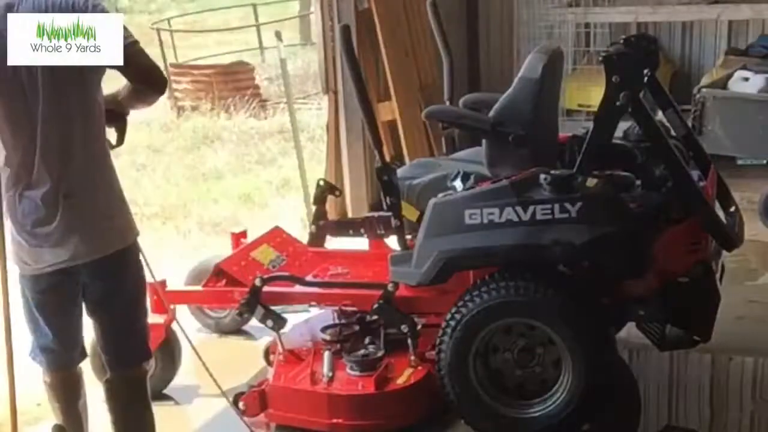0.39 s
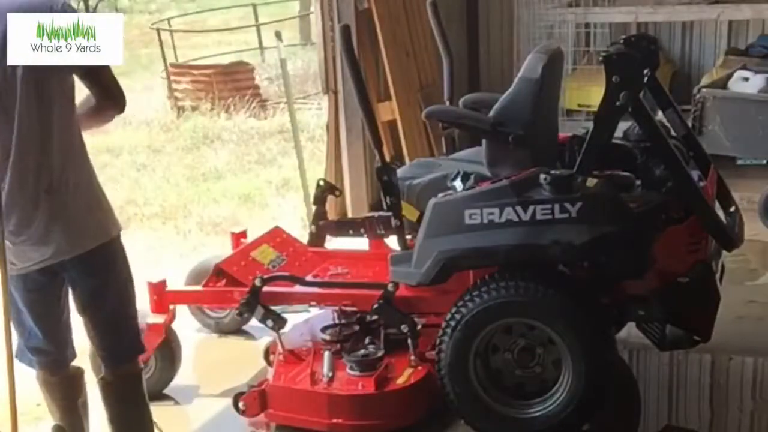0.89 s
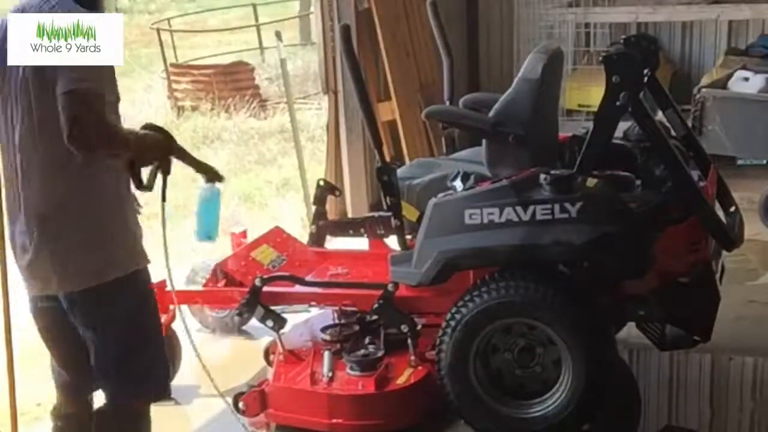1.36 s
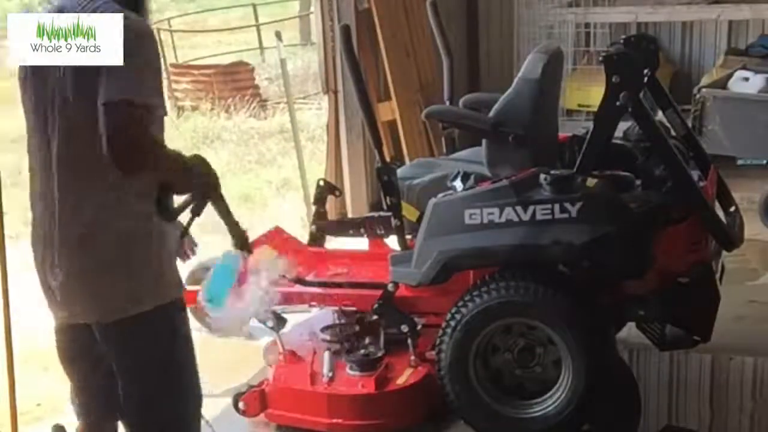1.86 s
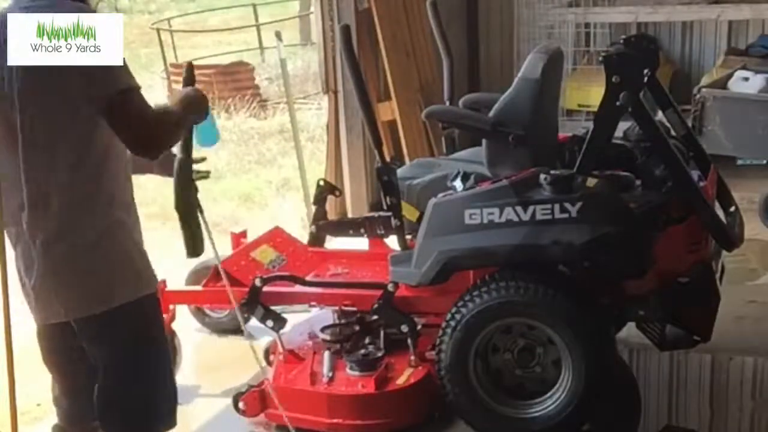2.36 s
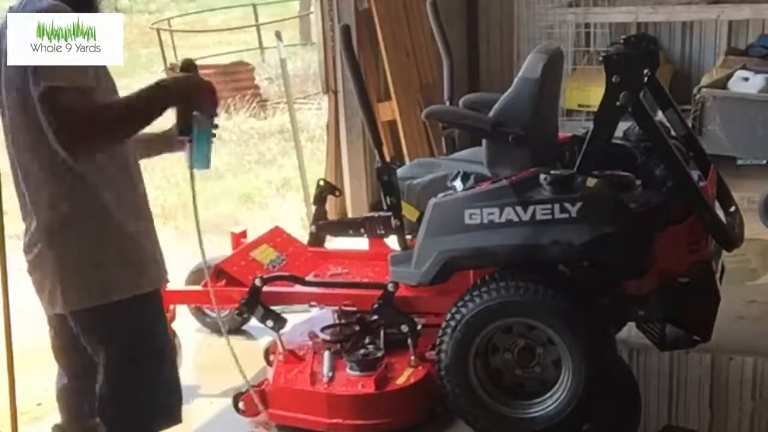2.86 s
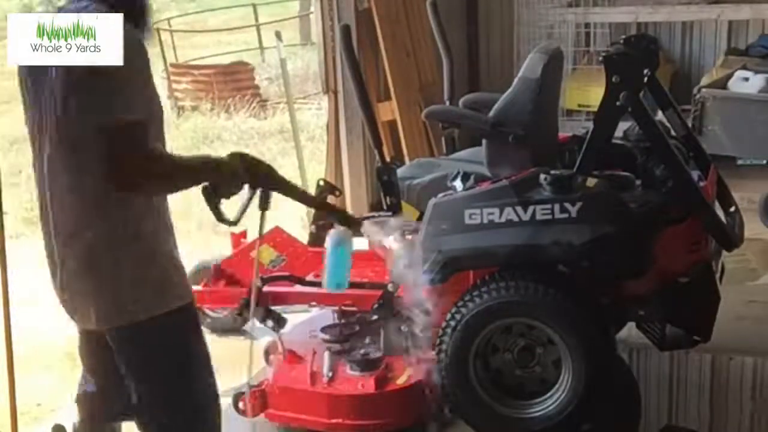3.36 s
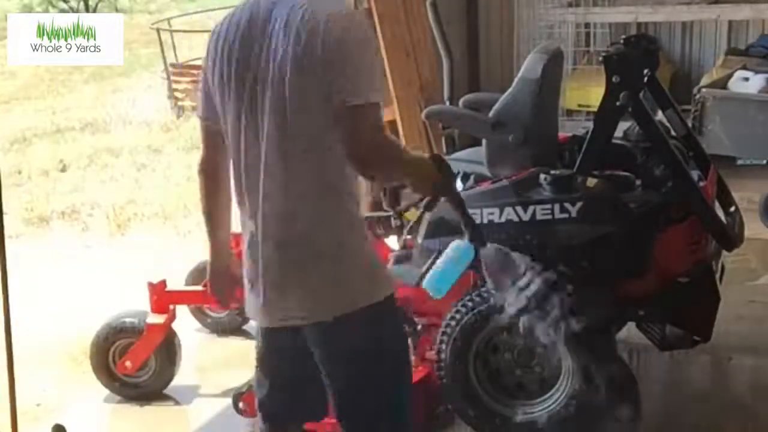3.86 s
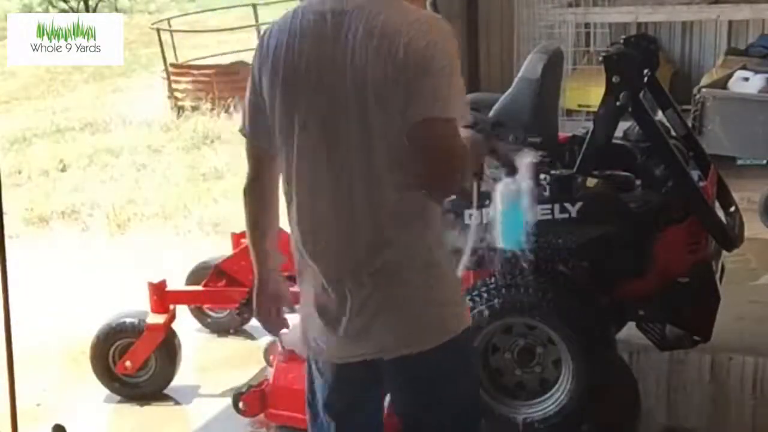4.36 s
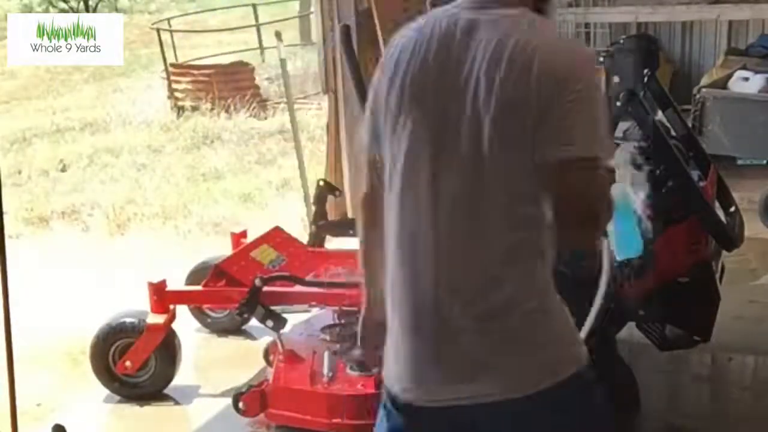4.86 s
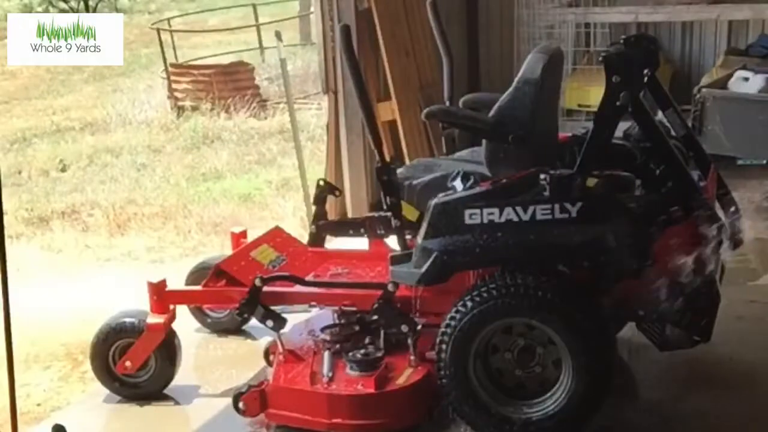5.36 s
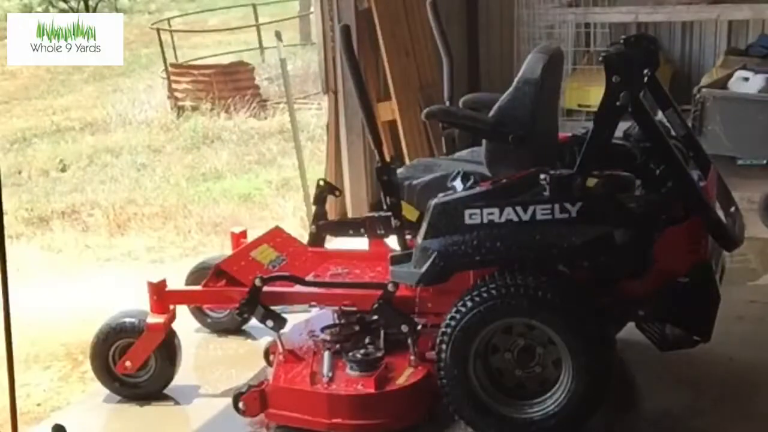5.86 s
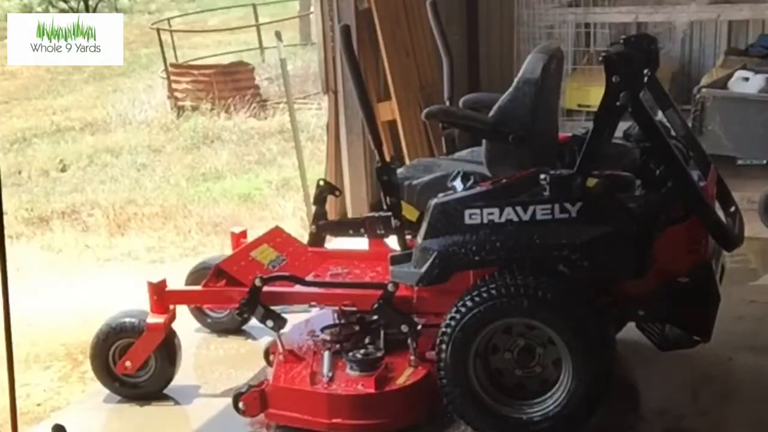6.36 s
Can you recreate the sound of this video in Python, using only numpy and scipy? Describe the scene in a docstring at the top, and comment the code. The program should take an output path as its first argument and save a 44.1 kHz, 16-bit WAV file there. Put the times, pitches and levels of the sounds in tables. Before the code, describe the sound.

In an open shed, an electric pressure washer whines at a high steady pitch over pump rattle and bright spray hiss. Two quick trigger releases make the motor sag and recover. Then it brakes and cuts out with knocks, a thin valve squeal and bleeding water. After a near-silent pause with three crackly spits, it kicks back on, glides up and runs steadily. A fairly close microphone picks up little bass.

```python
"""An electric pressure washer runs in an open shed: motor and gears whine over pump rattle, spray and mist.
Two short trigger releases bog the motor down. At a third, longer one the current is cut, a closing valve
squeals, water bleeds on, the gun spits three times and the motor starts again, then runs on steadily.
Tones are sines locked to the shaft speed, water is shaped noise, knocks and pings are dying sines,
the squeal is blurred gliding sines, and spits are crackly noise puffs through nozzle rings."""
import sys
import numpy as np
from scipy import signal
from scipy.fft import rfft, irfft
from scipy.io import wavfile
from scipy.ndimage import uniform_filter1d

SR = 44100
rng = np.random.default_rng(int(sys.argv[2]) if len(sys.argv) > 2 else 0)


def ratio_of_db(decibels):
    """Turn decibels (scalar or array-like) into linear amplitude factors; 0 dB maps to 1."""
    return 10 ** (np.asarray(decibels, float) / 20)


def dump_mix(stems):
    """Bounce the given channels to the path in sys.argv[1] as a 16-bit WAV at rate SR."""
    frames = np.atleast_2d(stems).T  # one column per channel
    limited = np.clip(frames, -1, 1)  # hard clip at full scale
    pcm = np.round(limited * 32767).astype(np.int16)
    wavfile.write(sys.argv[1], SR, pcm)


N = 286209
T = np.arange(N) / SR  # time of each sample [s]

MESH = 50 / 11  # gear tooth contacts per shaft turn
FIELD_HZ = 120  # magnetic pull at twice the mains
FULL_HZ = 359.4  # shaft at full speed
# weaker tones at full speed: (times shaft [-], times mesh [-], times field [-], level [dB])
WEAK_TONES = [(5, 0, 0, -55), (7, 0, 0, -57), (8, 0, 0, -59), (9, 0, 0, -51), (10, 0, 0, -54),
              (11, 0, 0, -55), (11.78, 0, 0, -48), (15, 0, 0, -53), (16, 0, 0, -59), (17, 0, 0, -55),
              (19, 0, 0, -58), (20, 0, 0, -61), (21, 0, 0, -59), (23, 0, 0, -54), (24, 0, 0, -60),
              (-1, 1, 0, -58), (1, 1, 0, -63), (2, 1, 0, -51), (6, 1, 0, -56), (10, 1, 0, -58),
              (12, 1, 0, -61), (13, 1, 0, -58), (-2, 2, 0, -58), (-1, 2, 0, -52), (1, 2, 0, -54),
              (5, 2, 0, -59), (-1, 3, 0, -58), (1, 3, 0, -62), (0, 5, 0, -55), (12, -1, 0, -60),
              (48, -1, 0, -60), (-1, 1, -1, -54), (1, 1, 1, -54), (0, 1, 1, -63), (1, 2, 1, -59),
              (0, 0, 4, -59), (0, 0, 7, -53), (0.52, 0, 0, -74)]
# reflections off the shed walls: (delay [s])
WALL_DELAYS = (0.017, .023)
# steady running drifts with load and as the user walks about:
# (time [s], shaft speed [Hz], gear mesh tone [dB], swell of the upper whine [dB])
RUNNING = [(0, 355.6, -26, -14), (.04, 358.7, -31.5, 2), (.7, 359.6, -30.5, -6), (1.3, 359.5, -30.5, -1),
           (1.6, 360.8, -38, -2), (1.85, 360.3, -35, 2), (2.08, 359.6, -32.5, 2), (3.6, 359.9, -30, -1.5),
           (3.9, 359.7, -32, 1), (4.3, 359.4, -30, 0), (4.75, 359.2, -30.5, 1), (5.05, 358.8, -27.5, -9),
           (5.35, 359, -29, -13), (5.5, 359.2, -26, -19), (5.88, 358, -27.5, -14),
           (6.15, 358.4, -26.5, -15), (6.49, 358.2, -29.5, -21)]
# short trigger releases: (let go [s], picks up again [s], most speed lost [Hz], run-up time constant [s])
BOGS = [(0.041, 0.121, 51.91, .115), (.797, .885, 124.7, .095)]
# the housing radiates low tones poorly, which sets the once-a-turn hum: (shaft speed [Hz], level [dB])
HUM_BY_SPEED = [(140, -97), (240, -79), (300, -60.5), (335, -50.5), (348, -51), (355, -43.5), (360, -40.5)]
# peaks and dips of housing and shed that each main tone crosses: (speed lost [Hz], change [dB])
MESH_PATH = [(0, -1), (1, 2), (2, -2.5), (3.9, 4.5), (5.6, -8.5), (7.3, -7), (10, 6), (12.7, -3.5),
             (14.5, 2), (20, -1.5), (24, -3.5), (29, 2), (34, -18.5), (44, 4), (60, -4.5), (74, 1.5),
             (92, -6), (125, 3), (150, -5)]
THIRD_PATH = [(0, -1), (5, -4.5), (16, -5), (50, -8.5), (75, -16), (160, -25)]
SIXTH_PATH = [(0, 0.5), (2.5, -1.5), (4.5, 9), (7, 2), (10, -5), (19, 0), (25, -3), (40, 7.5), (55, -5.5),
              (125, -22), (170, 0), (220, 5)]
# upper whine: (times shaft speed [-])
UPPER_ORDERS = (2, 2 * MESH, 12, 13, 3 * MESH, 14, 18)
# for each upper tone: (level [dB], share of the swell [-], loss per Hz of speed lost [dB/Hz])
UPPER_LEVELS = [(-49, -0.19, 0), (-45.5, 0.39, .08), (-43.5, 0.12, .01), (-51, .1, 0.5), (-48, .4, 0),
                (-45.5, .35, .01), (-46.5, .6, .1)]
# spectrum of the pump rattle: (frequency [Hz], relative density [dB per Hz])
RATTLE = [(110, -40), (160, -41.5), (190, -27), (230, -21.5), (400, -17), (600, -10), (720, -4), (1000, 1),
          (1200, -3.5), (1500, -3), (1800, -11), (2500, -9.5), (4000, -21.5)]
# spectrum of the spray: (frequency [Hz], relative density [dB per Hz])
SPRAY = [(1200, -34), (2200, -25), (3200, -4.5), (4300, 1.5), (5000, 2), (5500, -0.5), (6500, 1.5),
         (8500, 0), (9600, -1.5), (10300, -25), (12000, -43)]
# spectrum of the fine mist: (frequency [Hz], relative density [dB per Hz])
MIST = [(8500, -21), (10200, 0.5), (11000, -1), (13500, 3.5), (15000, -0.5), (15800, 8)]
# spectrum of the quiet air: (frequency [Hz], relative density [dB per Hz])
AIR = [(35, -70), (60, -57), (216, 3.5), (536, -1.5), (677, 3), (815, -8), (895, -4), (1840, -6),
       (15700, -13.5)]
# hum of a far machine: (frequency [Hz], level [dB])
FAR_HUM = [(683.7, -78), (915.2, -76.5)]
# blows inside the pump: (time [s], level [dB], extra weight on the lowest ring [dB])
KNOCKS = [(0.093, -37, -16), (.862, -14, 0.5), (0.875, -13, -16), (2.147, -19, 7.5), (2.161, -16.5, -14),
          (2.168, -24, -21), (2.178, -21, -21), (2.197, -34, -19), (2.217, -23.5, -9), (2.26, -26, -9),
          (2.316, -32.5, -3), (2.379, -33.5, -10), (3.007, -15, 6.5)]
# rings of the plastic housing before detuning: (frequency [Hz], level [dB], time to fall 60 dB [s])
HOUSING = [(493, -17, 0.06), (774, -7, 0.038), (961, -3.5, 0.057), (1154, -11.5, 0.051),
           (1417, -1.5, 0.016), (3020, -17, 0.008), (4620, -10.5, 0.024)]
# the pressure valve as it closes: (time [s], frequency [Hz], partial 1 [dB], partial 2 [dB], partial 3 [dB])
SQUEAL = [(2.2, 3800, -49.5, -70, -70), (2.215, 3940, -48, -45, -49), (2.24, 3690, -51, -39, -58),
          (2.291, 3520, -37.5, -37.5, -63), (2.334, 3440, -44, -46, -74), (2.381, 3560, -46.5, -50, -89),
          (2.419, 3320, -69, -79, -90)]
# trigger parts: (time [s], level [dB], frequency [Hz], time to fall 60 dB [s])
PINGS = [(2.738, -29, 6400, 0.035), (2.457, -54, 11500, .004), (3.022, -24, 9250, 0.03)]
# the gun spitting air and foam:
# (time [s], level [dB], rise [s], time to fall 60 dB [s], lowest ring [Hz], its level [dB])
SPITS = [(2.74, -39, 0.017, 0.26, 3120, -9), (2.83, -42.5, 0.015, 0.28, 3500, -10.5),
         (2.927, -40.5, 0.013, 0.18, 3350, 6)]
# rings of the nozzle: (frequency [Hz], width [Hz], level [dB])
NOZZLE = [(4000, 270, -11), (4400, 200, -4), (4860, 300, 3), (5400, 660, -2), (5950, 460, -7),
          (6950, 550, -4), (7900, 810, -8), (9400, 900, -18)]

# the long release: trigger let go, current cut, current back, rotor picks up
LET_GO_S, OFF_S, ON_S, PICK_UP_S = 2.08, 2.165, 3.008, 3.031
START_LOST_HZ, START_TAU_S = 151.7, 0.095  # speed still missing at pick-up, and how fast it is regained
BRAKE_HZ, BRAKE_S, BRAKE_BEND = 240.65, 0.11, 1.7  # against a shut valve: most lost, time scale, slow start
COAST_DB_PER_S = 197  # tones fade once the current is cut
KICK_S, ONSET_DB_PER_S = 0.011, 4000  # jolt of the restart
THIRD_DB, SIXTH_DB = -43, -43  # shaft orders 3 and 6
SEESAW, MESH_MEAN_DB = -0.33, -31  # both orders sink when the mesh tone swells above its mean
MESH_LOAD_DB, THIRD_LOAD_DB, SIXTH_LOAD_DB = 3.5, 20, -4.5  # change while braked
RATTLE_DB, SPRAY_DB, MIST_DB = -41, -37.5, -36.5  # steady spraying
RATTLE_LOAD_DB, RATTLE_START_DB, RATTLE_FADE_DB_PER_S = 8.5, 8, 143
SURGE_DB, SURGE_S = 4, 0.024  # the spray flares as the valve shuts
MIST_LOSS_DB, PRESSURE_S = -17, 0.038  # the mist thins while pressure is lost, and rebuilds
BLEED_DB, BLEED_S, BLEED_FADE_DB_PER_S, BLEED_MIST_DB = -3.5, 0.13, 101, -19  # water bleeds on after the cut
SHUT_S, SHUT_DB_PER_S = 0.215, 110  # the bleeding stops sharply
SPUTTER_DB, SPRAY_LEAD_S = 2.5, 0.0035  # bleeding water sputters; the jet opens just before the motor


def evened(x):
    """Scales to rms 1."""
    return x / np.sqrt(np.mean(x ** 2) + 1e-20)


def read(points, hz):
    """Reads a curve along a log-frequency axis."""
    f, value = np.transpose(points)
    return np.interp(np.log(hz + 1), np.log(f + 1), value)


def add(mix, s, sound):
    """Lays a sound into the mix at time s."""
    part = mix[round(s * SR):][:len(sound)]
    part += sound[:len(part)]


def since(s):
    """Seconds after s, zero before."""
    return np.maximum(T - s, 0)


def wander(t, top_hz):
    """Slow random movement of rms 1: sines of random phase, the slower ones stronger."""
    rates = np.geomspace(top_hz / 30, top_hz, num=16)
    return evened(sum(np.sin(2 * np.pi * (f * t + rng.random())) / np.sqrt(f) for f in rates))


def noise(spectrum, patchy_db):
    """Random short-time spectra with drifting louder and softer patches, rms 1."""
    hz = np.fft.rfftfreq(512, 1 / SR)
    a, b, patches = rng.standard_normal((N // 128 + 5, 257, 3)).T
    patches = uniform_filter1d(patches, size=5, axis=0)
    patches = evened(uniform_filter1d(patches, size=14, axis=1))
    z = (a + 1j * b) * ratio_of_db(read(spectrum, hz)[:, None] + patchy_db * patches)
    return evened(signal.istft(z, nperseg=512, noverlap=384)[1][:N])


def lost_speed():
    """Hz below running speed: braking against the shut valve, then an exponential run-up."""
    def braking(s):
        return BRAKE_HZ * (1 - np.exp(-(since(s) / BRAKE_S) ** BRAKE_BEND))

    lost = sum(np.minimum(braking(go), hz) * np.exp(-since(up) / tau) for go, up, hz, tau in BOGS)
    run_up = START_LOST_HZ * np.exp(-since(PICK_UP_S) / START_TAU_S)
    # the switch to the run-up falls midway through the pause
    return lost + np.where(T < (OFF_S + ON_S) / 2, braking(LET_GO_S), run_up)


def fading(db_per_s, hold=0, lead=0):
    """dB lost after the current is cut, won back sharply at the restart."""
    restart = ON_S + KICK_S / 2
    back = ONSET_DB_PER_S * np.maximum(restart - lead - T, 0)
    return -np.minimum(db_per_s * since(OFF_S + hold) * (T < restart), back)


def motor(sag_db=32, waver_db=1.5, ripple=0.8, whistle_db=-45):
    """Sines locked to the shaft, the gear mesh and the magnetic field; finer tones weaken as it slows."""
    s, *columns = np.transpose(RUNNING)
    running_hz, mesh_db, swell_db = (np.interp(T, s, c) for c in columns)
    # the rotor is heavy: no sudden change of speed
    lost = uniform_filter1d(lost_speed(), size=800, mode="nearest")
    hz = running_hz - lost
    turns = np.cumsum(hz) / SR
    frames = slice(None, None, 64)  # slow changes are worked out every 64 samples
    gliding = np.minimum(lost[frames] / 14, 1)

    def tone(order, db, field=0, waver=waver_db, depth=ripple):
        """One wavering tone; wall reflections make it flutter while it glides."""
        pitch = order * hz[frames]
        walls = sum(np.exp(2j * np.pi * pitch * delay) for delay in WALL_DELAYS) / len(WALL_DELAYS)
        flutter = ratio_of_db(waver * wander(T[frames], 12))
        flutter *= abs(1 + depth * gliding * walls) / (1 + 0.46 * depth * gliding)
        level = ratio_of_db(db) * np.interp(T, T[frames], flutter)
        return level * np.sin(2 * np.pi * (order * turns + field * FIELD_HZ * T + rng.random()))

    # 0 to 1: how fast the shaft is losing speed
    braked = uniform_filter1d(np.clip(np.gradient(lost) * SR / 900, 0, 1), size=400)
    seesaw_db = SEESAW * (mesh_db - MESH_MEAN_DB)
    main_db = (mesh_db + read(MESH_PATH, lost) + MESH_LOAD_DB * braked,
               THIRD_DB + seesaw_db + read(THIRD_PATH, lost) + THIRD_LOAD_DB * braked,
               SIXTH_DB + seesaw_db + read(SIXTH_PATH, lost) + SIXTH_LOAD_DB * braked)
    out = ratio_of_db(read(HUM_BY_SPEED, hz)) * np.sin(2 * np.pi * turns)
    for order, db in zip((MESH, 3, 6), main_db):
        out += tone(order, db, waver=0.6, depth=0)

    sag = -sag_db * lost / FULL_HZ - 9 * braked
    for order, (db, share, slope) in zip(UPPER_ORDERS, UPPER_LEVELS):
        slope_db = slope * np.minimum(lost, 40) * (1 - braked)
        out += tone(order, db + share * swell_db + sag - slope_db)
    for shaft, mesh, field, db in WEAK_TONES:
        # where the two multiples cancel to zero, braking alone weakens the tone
        change_db = sag if shaft + mesh else -30 * braked
        out += tone(shaft + mesh * MESH, db + change_db, field)

    # a very high whistle sounds only while the motor is braked
    whistle_order = 11 * MESH
    whistle = np.sin(2 * np.pi * whistle_order * turns)
    out += braked * (whistle_order * hz > 12800) * ratio_of_db(whistle_db) * whistle
    # sqrt(2) makes a tone's level its rms; the window softens both ends
    tones = np.sqrt(2) * out * ratio_of_db(fading(COAST_DB_PER_S)) * signal.windows.tukey(N, 0.002)
    return tones, braked, np.interp(T, T[frames], gliding)


def water(braked):
    """Pump rattle throbbing a little with the field, plus spray and fine mist that follow the pressure."""
    kick = (T > ON_S) * np.exp(-since(ON_S + KICK_S / 2) / KICK_S)
    releases = [row[0] for row in BOGS] + [LET_GO_S]
    surge = sum(since(s) / SURGE_S * np.exp(1 - since(s) / SURGE_S) for s in releases)
    keep = np.exp(-1 / (PRESSURE_S * SR))
    pressure_lost = signal.lfilter([1 - keep], [1, -keep], braked)
    pressure_lost += (T > ON_S) * np.exp(-since(ON_S) / PRESSURE_S)
    bleeding = np.minimum(since(OFF_S - SURGE_S) / SURGE_S, 1) * (T < ON_S)
    sputter_db = SPUTTER_DB * np.interp(T, T[::64], wander(T[::64], 60))

    rattle_db = RATTLE_DB + sputter_db * bleeding + RATTLE_LOAD_DB * braked
    rattle_db += RATTLE_START_DB * kick + fading(RATTLE_FADE_DB_PER_S)
    change_db = SURGE_DB * surge + (BLEED_DB + sputter_db) * bleeding
    change_db += fading(BLEED_FADE_DB_PER_S, hold=BLEED_S, lead=SPRAY_LEAD_S)
    change_db -= SHUT_DB_PER_S * since(OFF_S + SHUT_S) * (T < ON_S - KICK_S)
    mist_db = MIST_DB + change_db + MIST_LOSS_DB * pressure_lost * (1 - bleeding) + BLEED_MIST_DB * bleeding

    throb = 1 + 0.1 * np.sin(2 * np.pi * FIELD_HZ * T)
    rattle = ratio_of_db(rattle_db) * noise(RATTLE, patchy_db=1.5) * throb
    spray = ratio_of_db(SPRAY_DB + change_db) * noise(SPRAY, patchy_db=1.1)
    mist = ratio_of_db(mist_db) * noise(MIST, patchy_db=1.9)
    return rattle + spray + mist


def quiet_air(air_db=-66.5):
    """Soft shaped noise of the open air and the steady sines of a far machine."""
    hum = sum(ratio_of_db(db) * np.sin(2 * np.pi * hz * T) for hz, db in FAR_HUM)
    return ratio_of_db(air_db) * noise(AIR, patchy_db=1.5) + hum


def shed(x, t60=0.38):
    """Sparse reflections of random sign dying away."""
    taps = np.zeros(SR // 2)
    at = np.arange(400, len(taps) - 20, 20)
    jittered = at + rng.integers(0, 20, len(at))
    taps[jittered] = rng.choice([-1., 1.], len(at)) * ratio_of_db(-60 * at / SR / t60)
    return signal.fftconvolve(x, taps / np.linalg.norm(taps))[:N]


def ring(hz, db, t60, rise=0.0031):
    """One dying sine with a soft start."""
    t = np.arange(6000) / SR
    return ratio_of_db(db - 60 * t / t60) * np.sin(2 * np.pi * hz * t) * (1 - np.exp(-t / rise))


def knock(db, low_db, detune):
    """A blow inside the pump rings the plastic housing at several slightly detuned pitches."""
    out = 0
    for k, ((hz, level, t60), d) in enumerate(zip(HOUSING, detune)):
        out = out + ring(hz * d, db + level + low_db * (k == 0), t60)
    return out


def squeal(flutter_db=2.5, fourth_db=-19):
    """The closing valve's thin unsteady whistle; its partials are blurred by the rush of water."""
    s, *columns = np.transpose(SQUEAL)
    t = np.arange(s[0], s[-1], 1 / SR)
    hz, *levels = (np.interp(t, s, c) for c in columns)
    levels.append(levels[1] + fourth_db)  # partial 4 lies below partial 2
    turns, out = np.cumsum(hz) / SR, 0
    spans = (400, 90, 150, 40)  # smoothing of the blur [samples]: shorter is rougher
    clear = (1.6, 0.4, 0.8, 0.2)  # share of pure tone beside the blur
    for k, (db, span) in enumerate(zip(levels, spans)):
        a, b = uniform_filter1d(rng.standard_normal((2, len(t))), size=span)
        blur = evened(a) + 1j * evened(b) + clear[k]
        partial = evened((blur * np.exp(2j * np.pi * (k + 1) * turns)).real)
        out = out + ratio_of_db(db + flutter_db * wander(t, 60)) * partial
    return s[0], out


def trigger_ping(db, hz, t60):
    """A small trigger part rings as one short, high, dying sine."""
    return ring(hz, db, t60)


def spit(db, rise, t60, low_hz, low_db):
    """A crackly puff of air through the rings of the nozzle."""
    t = np.arange(12000) / SR
    puff = rng.standard_normal(len(t)) * ratio_of_db(2.5 * rng.exponential(1, len(t)))
    hz = np.fft.rfftfreq(len(t), 1 / SR)
    rings = NOZZLE + [(low_hz, 420, low_db)]
    shape = sum(ratio_of_db(level) / (1 + (2 * (hz - f) / width) ** 2) for f, width, level in rings)
    shape /= 1 + (2650 / (hz + 1)) ** 12  # too small to radiate low notes
    shaped = evened(irfft(rfft(puff) * shape, len(t)))
    return shaped * np.minimum(t / rise, 1) * ratio_of_db(db - 60 * t / t60)


def scene():
    """Motor, water, small blows, the echo of blows and gliding tones, and the quiet air, alike on both sides."""
    tones, braked, gliding = motor()
    steady, blows = tones + water(braked), np.zeros(N)
    air = quiet_air()
    # the echo of a fast glide lags in pitch and roughens it; less of it during run-up
    glides = tones * np.maximum(braked, 0.6 * gliding)
    detunes = rng.uniform(0.92, 1.05, (len(KNOCKS), len(HOUSING)))
    for (s, db, low_db), detune in zip(KNOCKS, detunes):
        add(blows, s, knock(db, low_db, detune))
    add(steady, *squeal())
    for s, *ping in PINGS:
        add(blows, s, trigger_ping(*ping))
    for s, *puff in SPITS:
        add(blows, s, spit(*puff))
    echo = shed(ratio_of_db(-10) * (blows + glides))
    mid = steady + blows + echo + air
    return np.array([mid, mid])


def low_pass(x):
    """Removes everything above the highest recorded frequency."""
    return signal.sosfilt(signal.butter(12, 15870, fs=SR, output="sos"), x)


def record(dry):
    """The microphone cuts the bass below about 150 Hz."""
    bass_cut = signal.butter(3, 150, "high", fs=SR, output="sos")
    thin = signal.sosfilt(bass_cut, dry)
    return low_pass(thin)


dry = scene()
out = record(dry)
dump_mix(out)
```